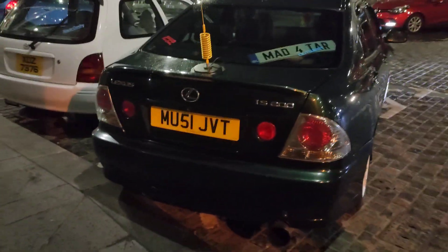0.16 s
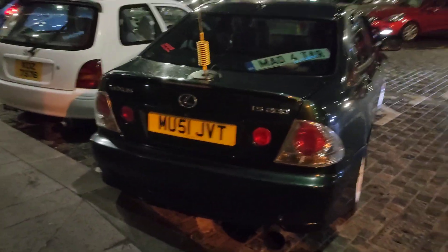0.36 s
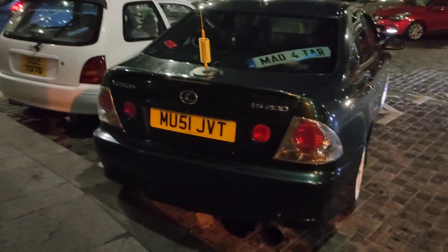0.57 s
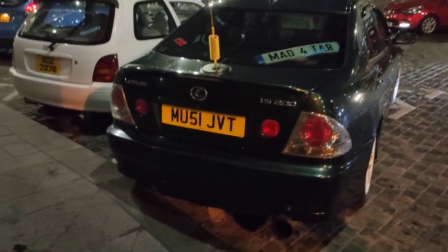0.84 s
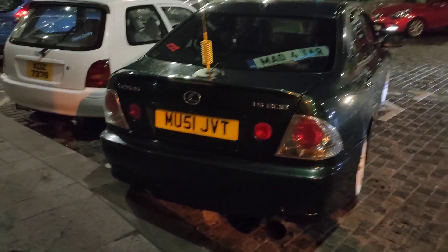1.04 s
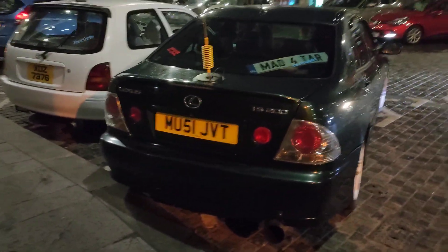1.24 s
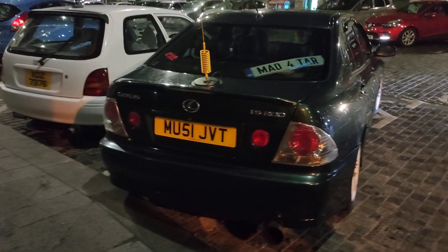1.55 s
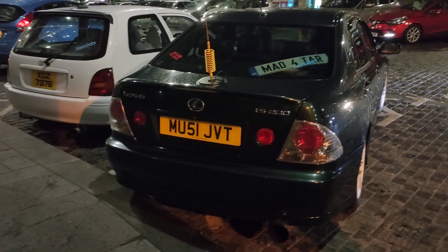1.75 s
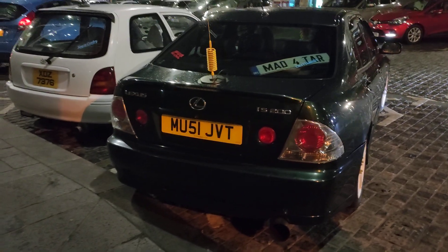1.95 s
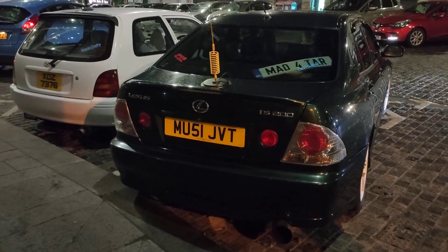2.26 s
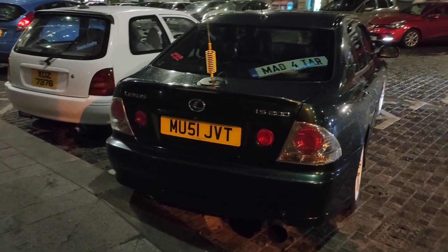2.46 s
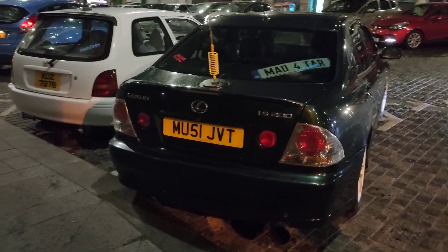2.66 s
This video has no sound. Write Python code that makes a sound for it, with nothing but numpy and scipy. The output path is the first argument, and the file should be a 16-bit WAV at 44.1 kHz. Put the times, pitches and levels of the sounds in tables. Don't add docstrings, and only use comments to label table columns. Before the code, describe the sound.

A parked six-cylinder car's exhaust, close behind the tailpipe, starts mid-rev and howls upward with a gassy rasp until 0.3 s. From 0.36 to 1.2 s it stutters on the limiter, with loud noisy backfires about every 0.1 s, then tight crackling pops until 1.4 s. The hollow note glides down smoothly, rasp fading, until 2.55 s, then stumbles into a thudding burble to the end. Stone walls echo briefly.

```python
import sys
import numpy as np
from scipy import signal
from scipy.fft import rfft, irfft
from scipy.io import wavfile
from scipy.ndimage import uniform_filter1d

SR = 44100
rng = np.random.default_rng(int(sys.argv[2]) if len(sys.argv) > 2 else 0)


def master_out(mix):
    frames = np.transpose(np.atleast_2d(mix))
    ceiling = np.clip(frames, -1, 1)
    pcm = np.round(ceiling * 32767).astype(np.int16)
    wavfile.write(sys.argv[1], SR, pcm)


def magnitude_from_level(level_db):
    exponent = np.asarray(level_db, float) / 20
    return 10 ** exponent


N = 123480

ENTER_S, LEAVE_S = 0.303, 1.32
# [t/s, peak level/dB, thump level/dB, t60/s]
BANGS = [(0.3639, -9, -22.5, 0.21), (0.474, -7.5, -33.5, 0.17), (0.5786, -7, -22, 0.2),
         (0.696, -7, -26.5, 0.16), (0.7972, -6.5, -28, 0.2), (0.8989, -10.5, -28, 0.27),
         (1.0088, -7.5, -28, 0.19), (1.1131, -9.5, -11, 0.15), (1.174, -9.5, -30, 0.19)]
# [f/Hz, level/dB]
AIR = [(5000, -33.5), (7000, 9.5), (8100, -13.5), (9000, -8), (13000, -7.5), (14600, -6), (15300, -3),
       (16000, -17)]


def level(x, db=0):
    return x * magnitude_from_level(db) / np.sqrt(np.mean(x ** 2))


def follow(t, table):
    rows = np.array(table)
    return [np.interp(t, rows[:, 0], column) for column in rows.T[1:]]


def smooth_switch(on, size):
    return uniform_filter1d(1. * on, size=size)


def drift(seconds):
    size = int(seconds * SR)
    x = uniform_filter1d(rng.standard_normal(N), size=size)
    x = uniform_filter1d(x, size=size)
    return x / np.std(x)


def hiss():
    a, b = rng.standard_normal((2, N))
    return a + .62 * b * np.array([[1], [-1]])


def bank(x, peaks):
    total = 0
    for k, (hz, width, db) in enumerate(peaks):
        total = total + (-1) ** k * magnitude_from_level(db) * signal.lfilter(*signal.iirpeak(hz, hz / width, fs=SR), x)
    return total


def colour(x, points):
    p, f = np.array(points), np.arange(1, 1026) * SR / 2050
    log_gain = np.interp(np.log(f), np.log(p[:, 0] + 1), p[:, 1]) * np.log(10) / 20
    cepstrum = irfft(log_gain)
    cepstrum[1:1024] *= 2
    cepstrum[1025:] = 0
    return signal.fftconvolve(x, irfft(np.exp(rfft(cepstrum)))[None], axes=1)[:, :N]


def street(t):
    # [f/Hz, level/dB]
    rumble = [(20, -4), (50, -39.5), (75, -1), (110, -1.5), (170, 5.5), (400, -40), (1000, -44)]
    smooth_from_s, smooth_to_s = 1.6, 2.68
    shake = magnitude_from_level(-39) * smooth_switch((t < smooth_from_s) | (t > smooth_to_s), 3000)
    return level(colour(hiss(), rumble)) * (magnitude_from_level(-69) + shake)


def echo(x, db):
    t60_s, first_wall_s = 0.36, .002
    t = np.arange(SR // 2) / SR
    scatter = rng.standard_normal((2, len(t))) * magnitude_from_level(-60 * t / t60_s) * (t > first_wall_s)
    scatter /= np.sqrt(np.sum(scatter ** 2, axis=1, keepdims=True))
    return magnitude_from_level(db) * signal.fftconvolve(x * np.ones((2, 1)), scatter, axes=1)[:, :N]


def hollow(x):
    # [f/Hz, width/Hz]
    notches = [(1940, 310), (3400, 112), (3880, 145), (7250, 350)]
    lift_off_s = 1.1
    share = .8 * (np.arange(N) > lift_off_s * SR)
    for hz, width in notches:
        x = x - share * signal.lfilter(*signal.iirpeak(hz, hz / width, fs=SR), x)
    return x


def pipe(x, count=8):
    # [f/Hz, width/Hz, level/dB]
    modes = [(113.7, 21, -4.5), (175, 32, -4), (237, 36.7, -2.5), (300, 67.6, -3.5), (348.4, 37, -1),
             (461.6, 42, -4.5), (551, 72, -6.5), (671.4, 39.6, -7.5), (908, 138, -12.5),
             (1400, 1300, -27.5)]
    low_cut = signal.butter(4, 107.6, "high", fs=SR, output="sos")
    return signal.sosfilt(low_cut, bank(x, modes[:count]))


def tail(x, peaks):
    return signal.sosfilt(signal.butter(6, 7020, fs=SR, output="sos"), bank(x, peaks))


def backfires(t):
    # [t/s, peak level/dB, thump level/dB, t60/s]
    pops = [(1.1304, -22, -37, 0.02), (1.238, -17, -25, 0.057), (1.256, -12.5, -40, 0.021),
            (1.2664, -10, -13, 0.033), (1.277, -10.5, -22.5, 0.093), (1.2943, -14, -14.5, 0.034),
            (1.3145, -11, -18, 0.033), (1.3703, -10.5, -18, 0.018), (1.378, -19, -17, 0.018),
            (1.3917, -9, -20, 0.0079)]
    # [t/s, peak level/dB, thump level/dB, t60/s]
    thuds = [
        (.287, -38, -12, 0.14),
        (2.58, -45.5, -21, 0.17),
        (2.621, -23, -15, 0.13),
        (2.71, -35.5, -14.5, 0.16),
        (2.755, -48, -19, 0.086),
        (2.778, -28.5, -11, 0.08),
    ]
    # [f/Hz, width/Hz, level/dB]
    panels = [(663.4, 15.5, -6.5), (892, 68, -1), (1304, 330, -4), (2490, 400, -1.5), (3837, 1600, -3.5),
              (4225, 790, 1), (5140, 1020, -1.5), (6500, 970, -4.5)]
    crack_db, crack_s = 1.5, 0.001
    spit_db, spit_s = -18.5, 0.0032
    bang_db, air_db = -4, -19.5
    burst, thump, spit = np.zeros((3, N))
    for s, db, thump_db, t60 in list(BANGS) + list(pops) + list(thuds):
        since = (t - s).clip(0)
        decay = magnitude_from_level(-60 * since / t60)
        burst += (t >= s) * magnitude_from_level(db) * (decay + magnitude_from_level(crack_db) * np.exp(-since / crack_s))
        spit += (t >= s) * magnitude_from_level(db + spit_db - air_db) * np.exp(-since / spit_s)
        thump += (t >= s) * magnitude_from_level(thump_db) * decay
    gas, push = hiss(), rng.standard_normal(N)
    bang = magnitude_from_level(bang_db) * tail(burst * gas, panels) / np.std(tail(gas, panels))
    air = magnitude_from_level(air_db) * colour((burst + spit) * gas, AIR) / np.std(colour(gas, AIR))
    silencer = [(682, 26, 0)]  # f/Hz, width/Hz, level/dB
    box = magnitude_from_level(-20) * bank(np.sqrt(burst) * push, silencer) / np.std(bank(push, silencer))
    low = pipe(thump * push, count=4) / np.std(pipe(push, count=4))
    return low + box, bang + air


def controls(t):
    # [t/s, firing f/Hz, firing note level/dB, overtone level/dB, gas rasp level/dB]
    rev_up = [
        (0.0, 250.3, -24, -26, -16),
        (0.056, 257, -18.5, -33, -18),
        (0.13, 278.1, -18, -24, -17.5),
        (0.165, 291.4, -17.5, -45, -17),
        (0.2, 299.3, -14, -25, -18.5),
        (0.25, 313.3, -16, -25, -18.5),
        (0.285, 325.6, -26, -26, -16),
    ]
    # [firing note level/dB, overtone level/dB, gas rasp level/dB]
    limit_db = (-22, -38, -34)
    # [t/s, f/Hz, note level/dB, overtone level/dB, rasp level/dB]
    run_down = [(1.345, 303, -18, -27, -40), (1.385, 307.5, -14.5, -30, -17.5),
                (1.47, 301.8, -16, -52, -19), (1.51, 300, -16.5, -28, -17),
                (1.69, 283.4, -18.5, -19, -19.5), (1.76, 277.6, -11.5, -28.5, -25),
                (1.936, 263.4, -15, -18, -31.5), (2.12, 250.4, -13.5, -29.5, -25.5),
                (2.33, 236.6, -15.5, -21, -25.5), (2.51, 222.7, -13.5, -29.5, -30),
                (2.565, 223.1, -12.5, -30, -29)]
    # [t/s, f/Hz, note level/dB, overtone level/dB, rasp level/dB]
    burble = [(2.606, 222.7, -21, -29, -32), (2.626, 234.3, -9, -25, -28.5),
              (2.648, 224.8, -25.5, -24.5, -31.5), (2.681, 222.3, -14, -32.5, -33.5),
              (2.706, 216.6, -30, -24, -32.5), (2.727, 216.3, -19, -35, -33), (2.745, 212.5, -23, -23, -31),
              (2.758, 212.3, -17, -23, -31.5), (2.782, 209.8, -20, -32, -34.5),
              (2.8, 207.8, -23.5, -36, -29.5)]
    # [t/s, one-cylinder rasp/0-1, lumpy cylinders level/dB, misfire level/dB]
    uneven = [(0, .1, -14, -11), (.2, .1, -20, -19), (.27, .1, -20, -16), (.29, .1, -12, -5),
              (1.3, .1, -12, -5), (1.37, .15, -20, -14), (1.5, .2, -22, -26), (1.7, .3, -22, -28),
              (1.8, .2, -18, -26), (1.92, .2, -7, -22), (2.06, .3, -14, -28), (2.18, 1, -17, -30),
              (2.36, .85, -21, -30), (2.45, .2, -16, -28), (2.54, .1, -13, -24), (2.58, .1, -12, -3),
              (2.66, .1, -14, -5), (2.72, .1, -12, -2), (2.8, .1, -12, -2)]
    limit_hz, bounce_hz, bounce_s, sag_s = 312, 46, .048, .02
    limiter = [(s, limit_hz, *limit_db) for s in (ENTER_S, LEAVE_S)]
    state = follow(t, list(rev_up) + limiter + list(run_down) + list(burble))
    since = t - np.array([ENTER_S] + [b[0] for b in BANGS])[:, None]
    bounce = np.max(np.exp(-((since - bounce_s) / sag_s) ** 2), axis=0)
    state[0] = state[0] + bounce_hz * bounce
    return state + follow(t, uneven)


def order(turns, n, db):
    return magnitude_from_level(db) * np.sqrt(2) * np.cos(2 * np.pi * n * turns - .5 * n)


def firing_note(turns, note_db, miss_db):
    stumble = uniform_filter1d(rng.standard_normal(N), size=int(.012 * SR))
    stumble = 2.2 * magnitude_from_level(miss_db + 5) * stumble / np.std(stumble)
    return order(turns, 1, note_db + stumble)


def overtones(t, turns, over_db):
    # [t/s, order 3 level/dB, order 4 level/dB, order 5 level/dB, order 6 level/dB]
    upper = [(0, -33.5, -30, -39, -47), (.27, -31, -43, -68, -58), (.31, -39, -59, -44, -45),
             (1.33, -41, -50, -44, -60), (1.4, -40, -32, -46, -61), (1.47, -35, -31, -44, -57),
             (1.62, -40.5, -30, -32.5, -44), (1.8, -44, -39, -40, -49), (2.1, -46, -51.5, -51.5, -69),
             (2.34, -31, -38.5, -44, -49), (2.5, -45, -44, -48, -48), (2.8, -54, -59, -61, -63)]
    total = order(turns, 2, over_db)
    for n, db in enumerate(follow(t, upper)):
        total = total + order(turns, n + 3, db + 2.8 * drift(.012))
    return total


def uneven_pushes(count, chance, note_db, lump_db, miss_db):
    cylinders = (2.5, 0.62, -1.2, -0.45, 1.08, -0.24)
    fired = np.diff(count, prepend=count[0]) > 0
    lump_gain = magnitude_from_level(lump_db + 1 + 1.2 * drift(.04))
    lumps = pipe(fired * lump_gain * np.array(cylinders)[count % 6], count=10)
    misfires = pipe(fired * magnitude_from_level(miss_db - 1) * chance)
    return (lumps + misfires) * magnitude_from_level(note_db) / np.std(pipe(fired * chance))


def gas_rasp(t, turns, count, chance, hz, rasp_db, single):
    # [f/Hz, width/Hz, level/dB]
    rasp = [(870, 280, -12), (1290, 355, -9), (2514, 470, -9.5), (3360, 580, -8.5), (4270, 690, -7),
            (5100, 350, 1), (5900, 780, -7)]
    # [f/Hz, width/Hz, level/dB]
    loaded_rasp = [(1226, 640, -3), (2300, 500, 3.5), (3070, 500, -1), (4050, 500, -5.5)]
    puff_turns, steady = .5, .4
    loud_puff, loud_puff_s = 2.4, .0015
    share, phase = single.clip(0, 1), turns % 1
    loud = count % 6 == 0
    size = magnitude_from_level(.5 * chance) * np.where(loud, 1 + loud_puff * share, 1 - share)
    puff = np.where(loud, puff_turns + share * (loud_puff_s * hz - puff_turns), puff_turns)
    gate = uniform_filter1d(size * np.exp(-(phase / puff) ** 2), size=12) + steady
    gas = gate * hiss()
    loaded = magnitude_from_level(-1.5) * np.exp(-t / 0.14) * level(tail(gas, loaded_rasp))
    snap_s = .00005
    snap = size * np.exp(-((phase - .1) / hz / snap_s) ** 2)
    body = level(tail(gas, rasp)) + level(tail(snap, rasp), -5) + loaded
    air = magnitude_from_level(-20 + rasp_db + .85 * (rasp_db + 26.5)) * level(colour(gate ** .25 * hiss(), AIR))
    air = signal.sosfilt(signal.butter(12, 15000, fs=SR, output="sos"), air)
    return magnitude_from_level(rasp_db) * hollow(body) + air


def lip_whistle(t):
    lip = [(14500, 700, 0)]  # f/Hz, width/Hz, level/dB
    blowing = smooth_switch((t > 1.38) & (t < 1.9), 2000)
    return blowing * level(bank(bank(hiss(), lip), lip), -51)


def engine(t):
    hz, note_db, over_db, rasp_db, single, lump_db, miss_db = controls(t)
    wobble_hz = 7 * magnitude_from_level(miss_db + 5) * drift(.012) * (t < LEAVE_S)
    turns = np.cumsum(hz + wobble_hz) / SR
    loud_cylinder_s = 2.182
    turns = turns - turns[int(loud_cylinder_s * SR)] + 6000
    count = turns.astype(int)
    push_chance, puff_chance = rng.standard_normal((1200, 2))[count - count[0]].T
    note = firing_note(turns, note_db, miss_db)
    low = overtones(t, turns, over_db) + uneven_pushes(count, push_chance, note_db, lump_db, miss_db)
    high = gas_rasp(t, turns, count, puff_chance, hz, rasp_db, single) + lip_whistle(t)
    return note, low, high


def scene():
    # [f/Hz, left minus right level/dB]
    ports = [(500, -5.8), (1000, -0.5), (2000, 2.2), (4000, -6), (6000, -5.5), (9000, -0.8), (12000, -6)]
    pan_db, lag_s = (0.16, 0.6), .0001
    t = np.arange(N) / SR
    note, low, high = engine(t)
    thump, crack = backfires(t)
    low, high = low + thump, high + crack
    side = np.array([[.5], [-.5]])
    high = high + echo(high, -8)
    high = np.vstack([colour(high[[k]], [(hz, db * side[k, 0]) for hz, db in ports]) for k in range(2)])
    near = note + echo(note, -15) + low + echo(low, -4) + high
    near = near * magnitude_from_level(np.interp(t, [0, t[-1]], pan_db) * side)
    near[1] = np.interp(t - lag_s, t, near[1])
    return near + street(t)


def top_cut(x):
    return signal.sosfilt(signal.butter(12, 16490, fs=SR, output="sos"), x)


def record(dry):
    soft = dry / (1 + (dry / .9) ** 6) ** (1 / 6)
    return top_cut(soft)


dry = scene()
out = record(dry)
master_out(out)
```